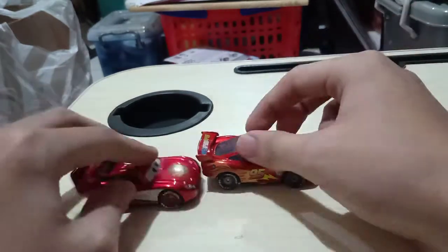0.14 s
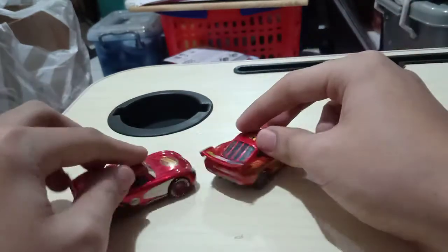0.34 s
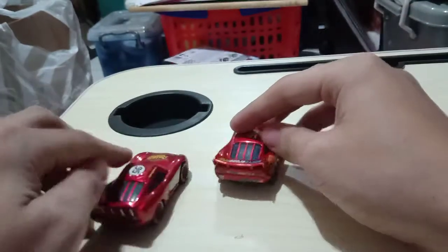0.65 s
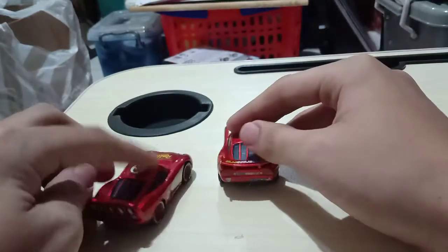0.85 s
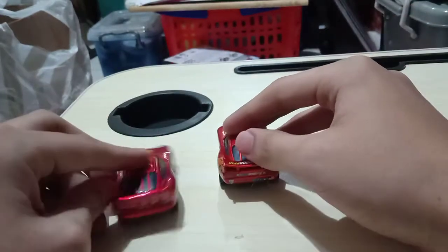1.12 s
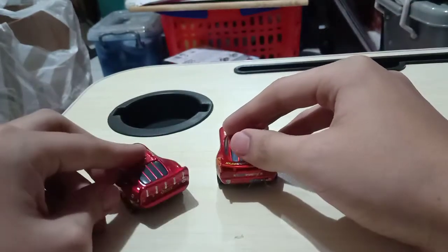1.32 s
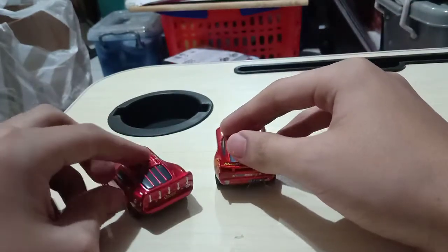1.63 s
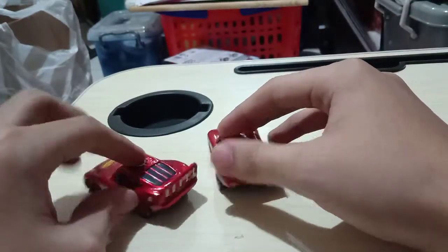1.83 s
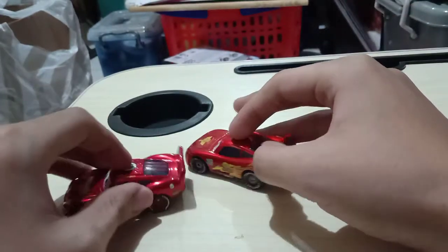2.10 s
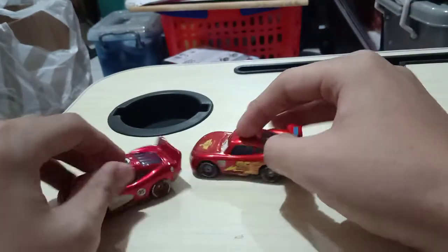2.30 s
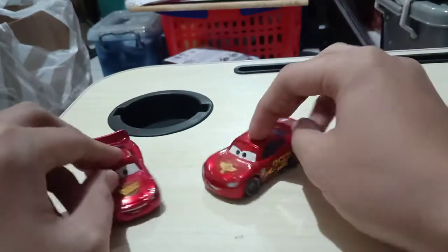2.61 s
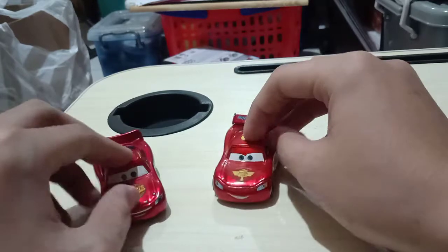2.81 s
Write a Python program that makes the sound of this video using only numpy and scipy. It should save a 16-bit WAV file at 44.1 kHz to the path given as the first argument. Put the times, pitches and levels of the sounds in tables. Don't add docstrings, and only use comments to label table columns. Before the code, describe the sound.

Close phone pickup of die-cast toy cars on a laminate desk top, starting with a sharp knock, then gritty scrapes, tiny clicks and short squeaks, a near-quiet pause, and a longer rattling push over faint room hiss.

```python
import sys
import numpy as np
from scipy import signal
from scipy.fft import rfft, irfft, next_fast_len
from scipy.io import wavfile
from scipy.ndimage import uniform_filter1d

SR = 44100
rng = np.random.default_rng(int(sys.argv[2]) if len(sys.argv) > 2 else 0)


def gain_from_decibels(decibels):
    exponent = np.asarray(decibels, float) / 20
    return 10 ** exponent


def dump(signal):
    limited = np.clip(np.atleast_2d(signal).T, -1, 1)
    pcm = np.round(limited * 32767).astype(np.int16)
    wavfile.write(sys.argv[1], SR, pcm)


N = 130095

# pitch_hz, level_db (per Hz)
HISS = [(18, -48), (42, -38), (59, -22), (81, -11.5), (124, -7), (227, -19.5), (480, -18.5), (1910, -22.5),
        (14800, -46.5), (16000, -48.5)]
# pitch_hz, correlation (-1 to 1)
HISS_LIKENESS = [(60, 0.934), (240, 0.82), (950, -0.35), (3770, 0.51), (15000, -0.5)]
# pitch_hz, level_db, width_hz
HUM_TONES = [
    (57.56, -67.5, 5.7),
    (120.78, -58.5, 5.2),
]
LEFT_DELAY = [0.0002007, 0.00010856]
# pitch_hz, level_db
LEFT_OVER_RIGHT = [(100, -16.5), (250, -1), (600, -4), (2000, -0.46), (5000, -1), (12000, 2.5)]
# pitch_hz, width_hz, depth (0-1)
MIC_HOLLOW = (9664, 6160, 0.74)
# pitch_hz, width_hz, level_db
DESK_MODES = [(188.5, 71.3, -6), (257.1, 47.6, 3), (318.95, 31.5, 1), (420.7, 48.1, 1), (474.7, 66, -2),
              (605.8, 129.2, -6.5), (728.3, 147.4, -5.5), (986.7, 248, -10.5)]
# pitch_hz, width_hz, level_db
SHELL_MODES = [(1425.3, 68, 1), (1754, 135, -1.5), (2180.8, 193.7, 6), (2420.6, 184, 10.5),
               (2778.7, 315, 5.5), (3397, 420, -2.5), (3724, 391, -1.5), (4450, 453, -2.5), (4982, 283, 2),
               (5135, 853, -6), (6784, 300, -15.5)]
# pitch_hz, width_hz, level_db
GRIT_BANDS = [(8770, 1100, -13.5), (11200, 670, -6), (13440, 6000, 4.5), (15470, 950, -2.5)]
# start_s, length_s, level_db, pitch_hz
SQUEAKS = [
    (2.028, 0.0566, -35.5, 971),
    (1.104, 0.01676, -37, 2300),
    (1.1, 0.01175, -22, 2360),
    (1.196, 0.005, -36, 2350),
]
# start_s, peak_db, thud_db, brightness_db, clatter_s
DESK_KNOCKS = [
    (0.182, -6.5, -11.5, -27.5, 0.00476),
    (0.9617, -29.5, -0.5, -22, 0.00585),
    (0.9814, -32, -7.5, -35.5, 0.0064),
    (1.1488, -30, -14, -13, 0.00454),
    (1.2694, -24, -3.5, -30.5, 0.01604),
    (2.1281, -17, -4.5, -36, 0.0049),
    (2.594, -26.5, -3, -20.5, 0.014),
    (2.6394, -26, -5, -21.5, 0.0146),
    (2.6664, -32, -25.5, -34.5, 0.005),
    (2.7965, -33.5, -4.5, -20, 0.0147),
]
# start_s, peak_db, click_hz, ping_db, brightness_db
EARLY_AXLE_TICKS = [(0.1778, -42.5, 4730, 16.5, -23.5), (0.1822, -14.5, 4740, 1, -22.5),
                    (0.2458, -37, 4740, 8.5, -30), (0.2745, -17, 4600, -3, -29),
                    (0.321, -38.5, 4860, 0, -29), (0.3474, -29.5, 5030, 6.5, -24),
                    (0.3615, -27, 4460, -21.5, -28.5), (0.3883, -37, 4970, -10, -22.5),
                    (0.4061, -28, 4770, -17.5, -29), (0.4904, -34.5, 4520, -6.5, -30.5),
                    (0.4908, -32, 4720, 0.5, -33), (0.526, -38, 4900, 10, -25.5),
                    (0.5415, -33, 4675, -2, -23), (0.6178, -36, 4420, 7.5, -24.5),
                    (0.6372, -46, 4240, 0.5, -28), (0.6522, -28, 4090, -6, -26.5),
                    (0.6582, -33, 4510, -14.5, -28), (0.6856, -32, 3630, 2.5, -25.5),
                    (0.7906, -49.5, 4840, 14.5, -24), (0.8376, -44.5, 4200, 9.5, -20),
                    (0.9626, -27.5, 4655, -13.5, -26), (0.982, -28.5, 5210, -7.5, -29),
                    (1.1062, -46, 4880, 8.5, -31), (1.149, -33.5, 4900, -11.5, 4),
                    (1.176, -33.5, 4730, 5.5, -20.5), (1.181, -30.5, 4990, 4.5, -21),
                    (1.2336, -32.5, 4530, -12, -28), (1.2384, -30, 5130, -23, -30),
                    (1.2519, -27.5, 4910, -21.5, -26), (1.2672, -25.5, 4300, 8, -21.5)]
# start_s, peak_db, click_hz, ping_db, brightness_db
LATE_AXLE_TICKS = [(1.6102, -49, 5180, 3.5, -26.5), (1.7968, -52.5, 5000, 11.5, -22.5),
                   (1.8102, -43.5, 4640, 3, -15.5), (1.8606, -53.5, 4580, -4.5, -23),
                   (1.861, -36.5, 4830, -2.5, -25.5), (1.9, -30.5, 4980, -4.5, -20.5),
                   (1.9474, -36, 4670, -11.5, -28), (1.9531, -31.5, 4200, -5, -28),
                   (1.9695, -30, 5324, 0, -32), (2.0233, -29.5, 5140, -10.5, -33),
                   (2.0536, -30.5, 4610, -9.5, -33), (2.0609, -25.5, 4970, -0.5, -35),
                   (2.0951, -29.5, 4210, 2.5, -24), (2.0974, -38.5, 4800, -9.5, -36.5),
                   (2.128, -22.5, 4630, -7.5, -27.5), (2.2348, -40, 4540, -6.5, -28),
                   (2.2595, -35, 4320, -18.5, -32.5), (2.3166, -48.5, 4760, 9, -30),
                   (2.3689, -31.5, 4357, 8, -7), (2.391, -32.5, 4990, -1.5, -8.5),
                   (2.4346, -33.5, 3630, 10.5, -20), (2.446, -29, 4860, 0.5, -26),
                   (2.4913, -26, 4500, -18.5, -26), (2.4942, -24, 4000, -21.5, -30),
                   (2.5013, -27.5, 4850, 10.5, -29.5), (2.5434, -17, 4000, -10, -35.5),
                   (2.586, -39.5, 5050, -15, -22.5), (2.5943, -33.5, 4450, -14.5, -23),
                   (2.6035, -24, 4455, -3, -18.5), (2.6358, -20.5, 3720, -2, -25.5),
                   (2.6623, -26.5, 5350, -5, -26.5), (2.7217, -18.5, 3852, -4, -29),
                   (2.7516, -33.5, 4000, 12, -17.5), (2.8009, -20, 4220, -31.5, -23.5)]
# start_s, peak_db, click_hz, ping_db, brightness_db
EXTRA_AXLE_TICKS = [(0.7192, -40.5, 4700, -1, -27), (1.199, -31, 5120, -2.5, -20.5),
                    (1.2806, -31, 4520, 9.5, -20.5), (1.6318, -55.5, 5000, 10, -14.5),
                    (1.67, -71.5, 3760, 4.5, -19), (1.7469, -48, 4910, -3.5, -24),
                    (1.8263, -56.5, 4920, 5.5, -12.5), (1.8761, -40.5, 5130, -6, -29),
                    (2.1325, -32.5, 5030, 6, -29), (2.5212, -18.5, 4080, -22.5, -31),
                    (2.768, -28.5, 4180, 8, -17.5)]
# time_s, drag_db, desk_weight_db, grit_db
PUSHES = [
    [(0.15, -66.5, 9, 3.5), (0.184, -34.5, 2, 11.5), (0.224, -38, -5, -7), (0.3, -38, 1.5, -1),
     (0.402, -33.5, -1.5, 12.5), (0.548, -43, -0.5, 1.5), (0.6, -57.5, -0.5, 12)],
    [(0.6, -49.5, 5, -3), (0.656, -38.5, -5.5, 11), (0.754, -55, 4.5, 14), (0.954, -51.5, 1.5, 16),
     (0.966, -38, -3, 10), (1.07, -66.5, 11.5, 12.5)],
    [(1.07, -55, 5, 21), (1.112, -49.5, 0.5, -9.5), (1.124, -52, 3, 8.5), (1.28, -36, 0, 13),
     (1.438, -81, -2.5, -7), (1.5, -76.5, 11.5, -7.5)],
    [(1.55, -89.5, 13, -4.5), (1.63, -63, 8, 20), (1.782, -71.5, 10.5, 18.5), (1.808, -53.5, 6, 14),
     (1.93, -41, 1.5, 15), (2.068, -37, -3, -1.5), (2.118, -48, 4.5, 1), (2.14, -44.5, 1.5, 2),
     (2.3, -51.5, 7.5, 3.5)],
    [(2.3, -54.5, 7, -6.5), (2.444, -38.5, -0.5, 11.5), (2.672, -33.5, -3.5, 7), (2.68, -39.5, -2, -7),
     (2.812, -40.5, 3, 1), (2.95, -95.5, 13.5, -0.5)],
]

HISS_DB = -60
ROOM_T60_S, ROOM_DB, NEAR_T60_S, NEAR_DB = 0.202, -9, 0.0386, -4
GRIP_DETUNE, GRIP_DB, GRIP_SWAY_DB = 0.0219, 3, 4
KNOCK_DB, KNOCK_THUD_DB, KNOCK_GRIT_DB = 1.5, -3, 10
TICK_DECAY_S, TICK_DB, TICK_WIDTH_HZ, TICK_THUD_DB, TICK_GRIT_DB = 0.00247, 2.82, 1115, -18.5, -15.5
PING_HZ, PING_SPREAD, PING_WIDTH_HZ, PING_DB = 2489, 0.0245, 375, -4
SLIPS_PER_S, SLIP_SPREAD_DB, JUDDER_DB, JUDDER_S = 1800, 4.5, 2, 0.00923
DRAG_DB, DESK_DB, SHELL_DB, GRIT_DB = -2.5, -2.5, 2, -30
BAND_EDGE_HZ, OFFSET = 15900, 0.0011


def evened(x):
    return x / np.sqrt(np.mean(x ** 2) + 1e-20)


def read(points, hz):
    f, value = np.transpose(points)
    return np.interp(np.log(hz + 1), np.log(f + 1), value)


def smooth_noise(span, shape=N):
    return uniform_filter1d(uniform_filter1d(rng.standard_normal(shape), span), span)


def random_signs(shape):
    return rng.choice([-1., 1.], shape)


def add(mix, start_s, sound):
    part = mix[..., round(start_s * SR):][..., :sound.shape[-1]]
    part += sound[..., :part.shape[-1]]


def ring(x, hz, width):
    return signal.lfilter(*signal.iirpeak(min(hz, SR * 0.45), hz / max(width, 1), SR), x)


def ring_twice(x, hz, width):
    return ring(ring(x, hz, width), hz, width)


def body(x, modes):
    click = np.eye(1, 4096)[0]
    pulse = 0
    for k, (hz, width, db) in enumerate(modes):
        pulse = pulse + (-1) ** k * gain_from_decibels(db) * ring(click, hz, width)
    return signal.oaconvolve(x, pulse / np.linalg.norm(pulse))[:len(x)]


def hiss():
    frames, hz = N // 256 + 5, np.fft.rfftfreq(1024, 1 / SR)
    a, b, c, d = rng.standard_normal((frames, 513, 4)).T
    left, other = a + 1j * b, c + 1j * d
    same = np.clip(read(HISS_LIKENESS, hz), -1, 1)[:, None]
    right = same * left + np.sqrt(1 - same ** 2) * other
    spectrum = np.array([left, right]) * gain_from_decibels(read(HISS, hz))[:, None]
    noise = signal.istft(spectrum, nperseg=1024, noverlap=768)[1][:, :N]
    return gain_from_decibels(HISS_DB) * evened(noise)


def hum():
    t, out = np.arange(N) / SR, np.zeros(N)
    for hz, db, width in HUM_TONES:
        waver = evened(smooth_noise(2000))
        out += gain_from_decibels(db + waver) * np.sin(2 * np.pi * hz * t + 0.121 * width * waver)
    return out


def tail(t60_s, start_s):
    t = np.arange(SR // 3) / SR
    shape = (2, len(t))
    taps = random_signs(shape) * (rng.random(shape) < 0.05) * gain_from_decibels(-60 * t / t60_s) * (t > start_s)
    return taps / np.linalg.norm(taps, axis=1, keepdims=True)


def ports(cars):
    size = next_fast_len(N + SR // 2)
    hz = np.fft.rfftfreq(size, 1 / SR)
    z = rfft(cars, size)
    right = z.sum(0)
    left = sum(z[k] * np.exp(-2j * np.pi * hz * LEFT_DELAY[k]) for k in range(2))
    tilt = gain_from_decibels(read(LEFT_OVER_RIGHT, hz) / 2)
    echo = gain_from_decibels(ROOM_DB) * rfft(tail(ROOM_T60_S, 0.0068), size) * right
    for car in z:
        echo = echo + gain_from_decibels(NEAR_DB) * rfft(tail(NEAR_T60_S, 0.0006), size) * car
    treble = hz / (hz + 900)
    return irfft(np.array([left * tilt, right / tilt]) + echo * treble, size)[:, :N]


def shell(drive):
    share = gain_from_decibels(GRIP_SWAY_DB * evened(uniform_filter1d(
        uniform_filter1d(rng.standard_normal((4, N)), 1300), 1300)))
    hz, width, db = np.transpose(SHELL_MODES)
    out = 0
    for part in share / np.linalg.norm(share, axis=0):
        detune, lift = rng.standard_normal((len(SHELL_MODES), 2)).T
        modes = np.transpose([hz * (1 + GRIP_DETUNE * detune), width, db + GRIP_DB * lift])
        out = out + body(drive * part * random_signs(N), modes)
    return out


def squeaks(out):
    for start, length, db, hz in SQUEAKS:
        noise = rng.standard_normal(len(np.arange(0, length, 1 / SR)))
        tone = evened(ring_twice(noise, hz, 120))
        add(out[3, 0], start, gain_from_decibels(db) * np.hanning(len(noise)) * tone)


def knocks(out):
    t = np.arange(2600) / SR
    for k, (start, db, thud_db, bright_db, length) in enumerate(DESK_KNOCKS):
        bounces = 0.455 + 3.43 * (rng.random(len(t)) < 0.012)
        burst = bounces * rng.standard_normal(len(t)) * np.exp(-t / max(length, 0.001)) * gain_from_decibels(db + KNOCK_DB)
        levels = gain_from_decibels([[thud_db + KNOCK_THUD_DB], [0], [bright_db + KNOCK_GRIT_DB]])
        add(out[:3, k % 2], start, burst * levels)


def axle_ticks(out):
    t = np.arange(2600) / SR
    ticks = EARLY_AXLE_TICKS + LATE_AXLE_TICKS + EXTRA_AXLE_TICKS
    for k, (start, db, hz, ping_db, bright_db) in enumerate(ticks):
        burst = rng.standard_normal(len(t)) * np.exp(-t / TICK_DECAY_S)
        click = ring_twice(burst, hz, TICK_WIDTH_HZ)
        ping_hz = PING_HZ * (1 + PING_SPREAD * rng.uniform(-0.964, 1))
        ping = ring(burst, ping_hz, PING_WIDTH_HZ)
        lone = click / abs(click).max() + gain_from_decibels(ping_db + PING_DB) * ping / abs(ping).max()
        thud = burst * gain_from_decibels(ping_db + TICK_THUD_DB)
        grit = burst * gain_from_decibels(bright_db + TICK_GRIT_DB)
        add(out[:, k % 2], start, gain_from_decibels(db + TICK_DB) * np.array([thud, 0 * t, grit, lone]))


def slips():
    size = gain_from_decibels(SLIP_SPREAD_DB * np.minimum(rng.exponential(1, N), 4)) * random_signs(N)
    judder = evened(smooth_noise(max(int(JUDDER_S * SR), 2)))
    happens = rng.random(N) < SLIPS_PER_S / SR
    return evened(size * happens * gain_from_decibels(JUDDER_DB * judder))


def tyre_slides(out):
    t = np.arange(N) / SR
    s, drag, weight, grit = np.transpose(np.concatenate(PUSHES))
    drag_db = np.interp(t, s, drag, -90, -90) + DRAG_DB
    desk_db = DESK_DB + np.interp(t, s, weight)
    grit_db = GRIT_DB + np.interp(t, s, grit)
    for car in range(2):
        out[:3, car] += slips() * gain_from_decibels(drag_db) * gain_from_decibels([desk_db, SHELL_DB + 0 * t, grit_db])


def scene():
    forces = np.zeros((4, 2, N))
    for source in (squeaks, knocks, axle_ticks, tyre_slides):
        source(forces)
    cars = []
    for desk, drive, grit, lone in forces.swapaxes(0, 1):
        cars.append(body(desk, DESK_MODES) + shell(drive) + body(grit, GRIT_BANDS) + lone)
    near = ports(np.array(cars))
    hollow_hz, hollow_width, depth = MIC_HOLLOW
    return near - depth * ring(near, hollow_hz, hollow_width) + hiss() + hum()


def band_limit(x):
    return signal.sosfilt(signal.butter(12, 16640, fs=SR, output="sos"), x)


def record(dry):
    low_pass = signal.firwin(255, BAND_EDGE_HZ, fs=SR)[None]
    narrow = signal.oaconvolve(dry, low_pass, "same")
    return band_limit(narrow + OFFSET)


dry = scene()
out = record(dry)
dump(out)
```